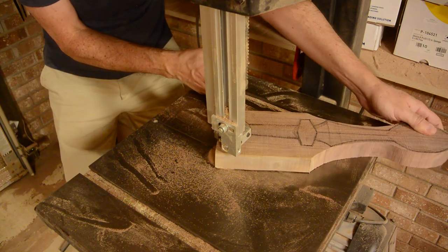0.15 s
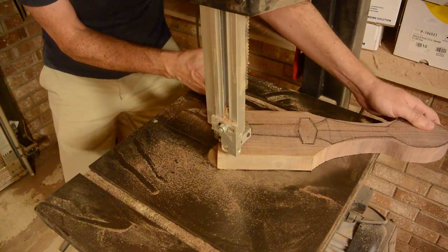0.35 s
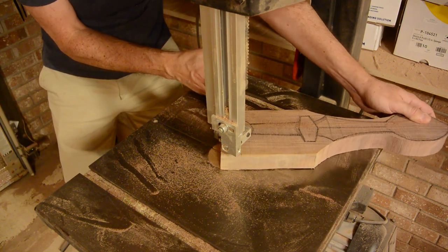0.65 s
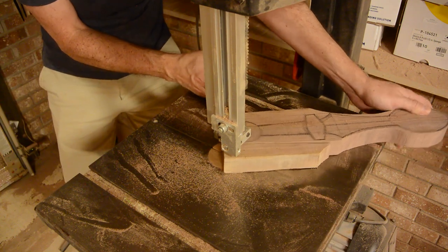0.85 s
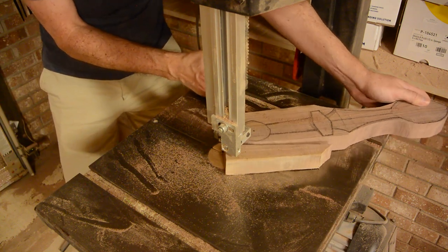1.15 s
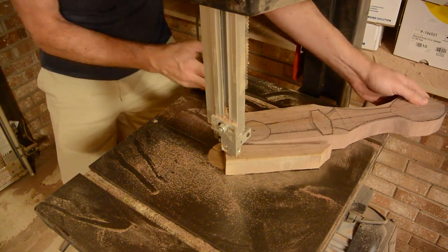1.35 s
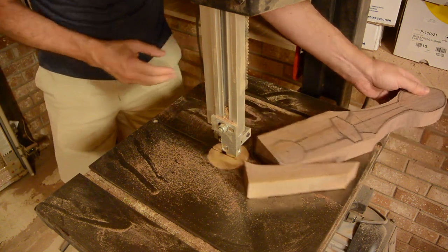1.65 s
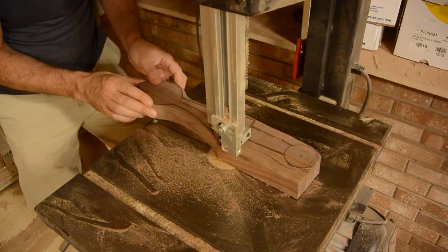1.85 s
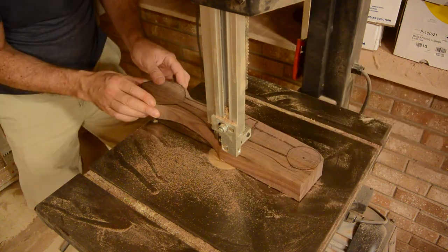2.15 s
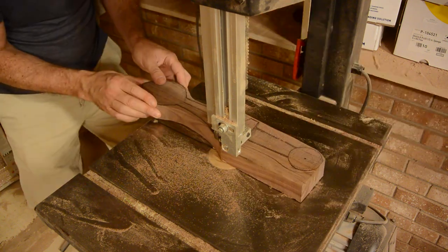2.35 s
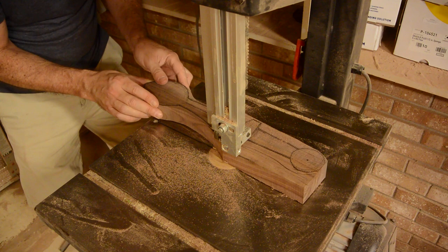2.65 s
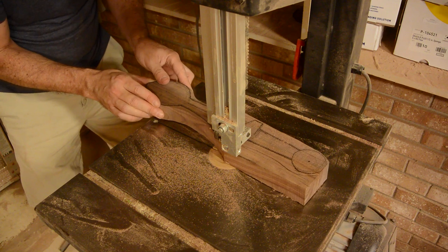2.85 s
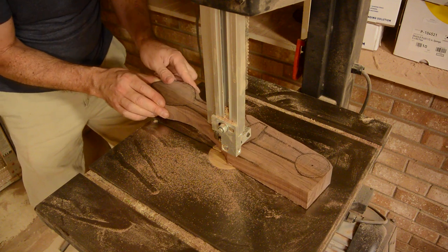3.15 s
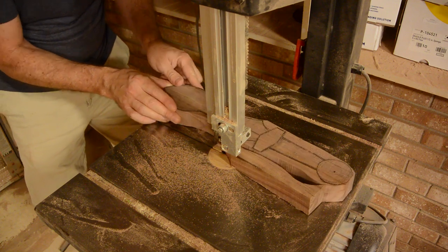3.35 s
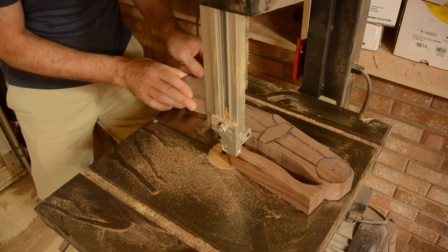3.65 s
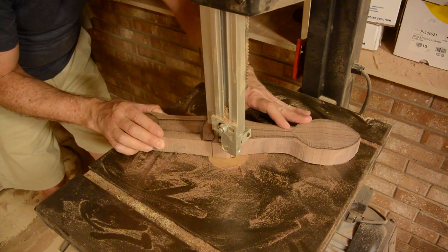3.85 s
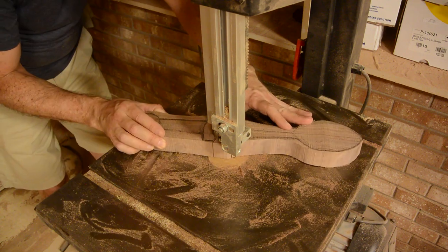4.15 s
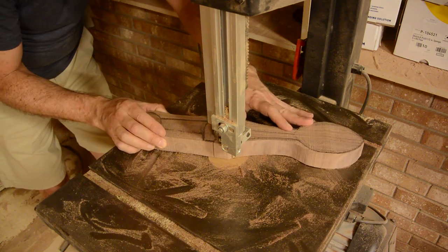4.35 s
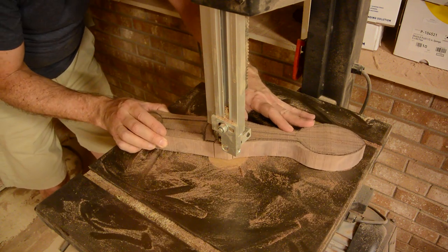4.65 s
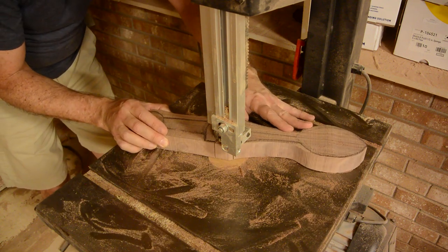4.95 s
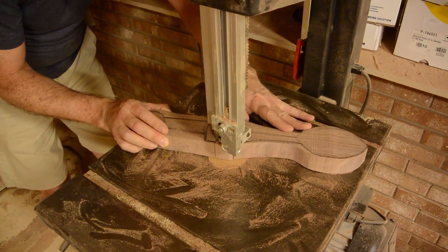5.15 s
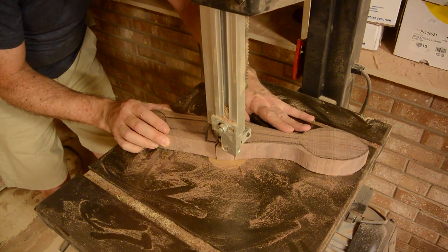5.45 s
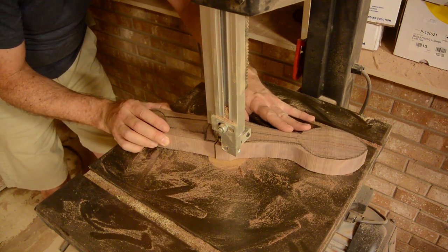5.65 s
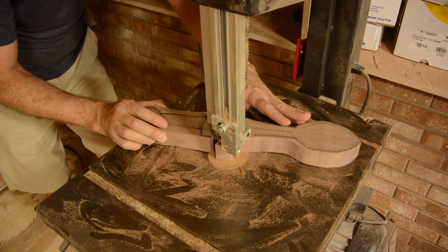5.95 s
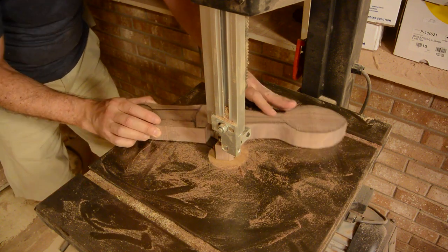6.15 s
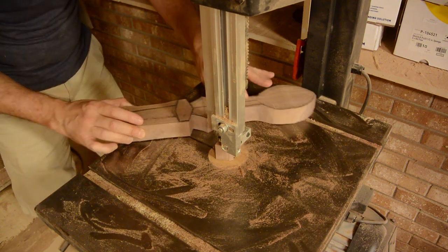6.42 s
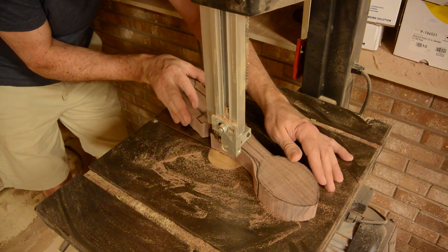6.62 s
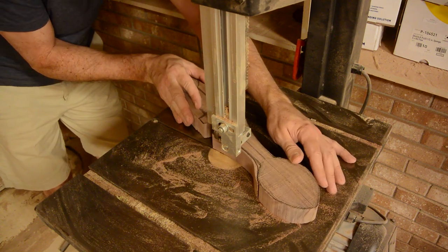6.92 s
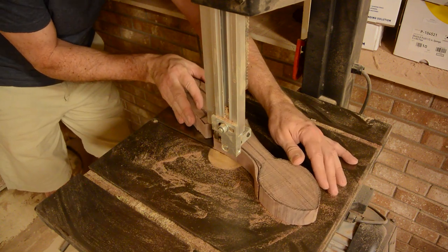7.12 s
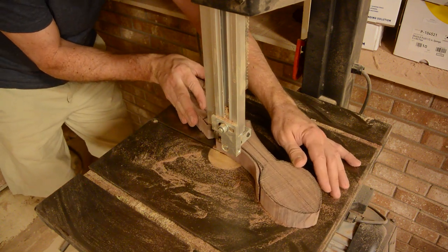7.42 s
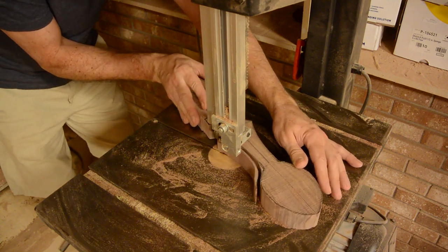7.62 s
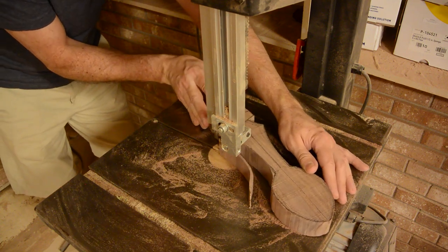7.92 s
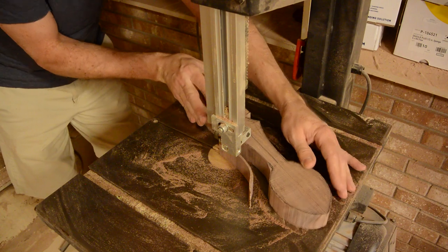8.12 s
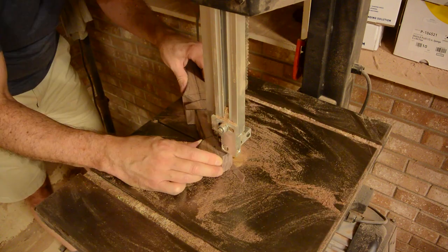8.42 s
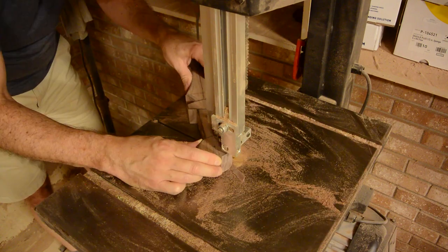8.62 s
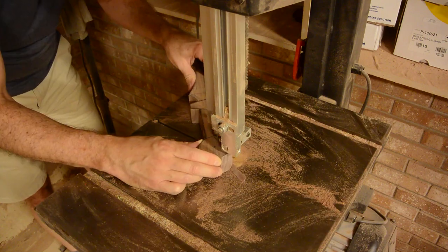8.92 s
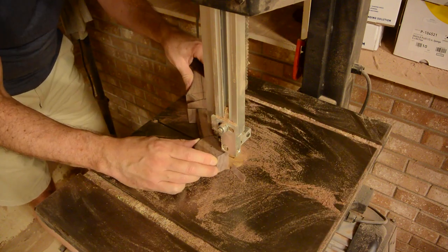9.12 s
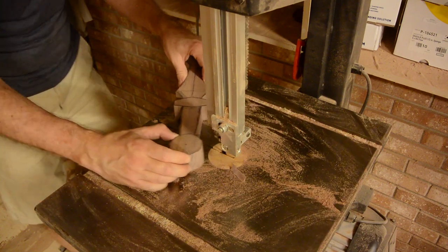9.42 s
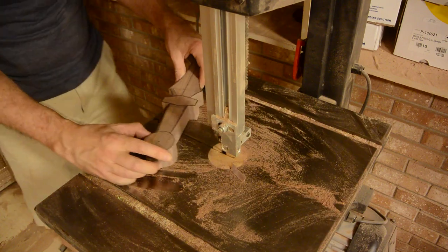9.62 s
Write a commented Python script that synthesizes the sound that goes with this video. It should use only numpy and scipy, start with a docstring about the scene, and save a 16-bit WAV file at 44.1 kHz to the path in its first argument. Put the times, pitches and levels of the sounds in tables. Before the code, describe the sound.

Close stereo pickup of a bandsaw cutting a shaped hardwood board. It starts mid-cut with rasping and squealing, breaks free into bright hiss and a low sagging flutter, then bites again four more times, the third cut longest and the fifth shortest. The board scrapes and knocks on the iron table. The level ducks in the cuts and rises afterward, with a short, dense room tail.

```python
"""Bandsaw in hardwood

A bandsaw in a small workshop makes five cuts in a thick hardwood board, close to a camera.
Free, the band hisses and rings: coloured noise and wavering sines. In the wood, a sine at the tooth rate,
pulsing noise and narrow noise bands sing, rasp and squeal. The board scrapes and knocks: noise bursts.
The camera's gain control ducks under each cut and swells back up when the blade breaks out."""
import sys
import numpy as np
from scipy import signal
from scipy.fft import rfft, irfft, next_fast_len
from scipy.io import wavfile
from scipy.ndimage import uniform_filter1d, map_coordinates

SR = 44100
rng = np.random.default_rng(int(sys.argv[2]) if len(sys.argv) > 2 else 0)


def int16_out(signal):
    """Quantize to a 16-bit WAV file."""
    q = np.round(np.clip(np.atleast_2d(signal).T, -1, 1) * 32767)
    wavfile.write(sys.argv[1], SR, q.astype(np.int16))


N = 431298

# The blade is in the wood. Each row: start in seconds, end in seconds, tooth rate in Hz,
# relative levels of tooth tone, rasp and sawdust hiss in dB, surge at the exit in dB,
# band slack afterwards in seconds, relative level of the flapping afterwards in dB.
CUTS = [(0, 0.91, 643, -39.5, -32, -34, -4, 0.4, -35), (1.881, 3.286, 643, -43.5, -33.5, -37, 5, 0.35, -39),
        (3.848, 5.491, 645.8, -36, -29.5, -32, -3.5, 0.095, -33.5),
        (6.534, 7.79, 650, -39.5, -32, -32.5, 1, 0.08, -32.5),
        (8.455, 8.835, 637, -57, -35.5, -36, -1, 0.044, -32)]


def amp(db):
    """Decibels to gain."""
    return 10 ** (np.asarray(db) / 20)


def unit(x):
    """x at rms 1."""
    return x / np.sqrt(np.mean(x ** 2) + 1e-20)


def clock():
    """The time of each sample in seconds."""
    return np.arange(N) / SR


def along(points, hz):
    """Interpolate (Hz, value) points on a log frequency axis."""
    point_hz, values = np.transpose(points)
    return np.interp(np.log(hz + 1), np.log(point_hz + 1), values)


def wobble(rate_hz, size=N):
    """A smooth random curve with rate_hz knots a second."""
    t = np.arange(size) / SR
    coarse_t = t[::32]
    knots = rng.standard_normal(int(size * rate_hz / SR) + 4)
    coarse = map_coordinates(knots, [coarse_t * rate_hz])
    return np.interp(t, coarse_t, coarse)


def gate(t, start, end, edge_s):
    """1 from start to end, with ramps edge_s long centred on both."""
    return np.clip(np.minimum(t - start, end - t) / edge_s + .5, 0, 1)


def noise(colour_db, size=N):
    """Stereo noise with a mid of rms 1; the treble is wider than the bass."""
    # Each row: frequency in Hz, side minus mid in dB.
    side_width = [(60, -31), (110, -15.5), (210, -20), (390, -21.5), (730, -8.5), (1370, -11), (2550, -7),
                  (4760, -7), (8900, -3.5)]
    m = next_fast_len(size, True)
    hz = np.fft.rfftfreq(m, 1 / SR)
    spectra = rfft(rng.standard_normal((2, m))) * amp(colour_db(hz))
    spectra = spectra * [np.ones(len(hz)), amp(along(side_width, hz))]
    mid, side = irfft(spectra, m)[:, :size]
    return np.array([mid + side, mid - side]) / np.std(mid)


def burst(start, end, colour_db, edge_s):
    """Noise of one colour that fades in and out."""
    t = np.arange(int(max(end - start, edge_s) * SR)) / SR
    return noise(colour_db, size=len(t)) * gate(t, edge_s / 2, t[-1] - edge_s / 2, edge_s)


def tone(hz):
    """A sine of rms 1 that follows a pitch curve."""
    return np.sqrt(2) * np.sin(2 * np.pi * np.cumsum(hz) / SR)


def add(track, start, sound):
    """Mix a stereo sound in at start seconds."""
    part = track[:, max(round(start * SR), 0):][:, :sound.shape[1]]
    part += sound[:, :part.shape[1]]


def below(x, edge_hz):
    """x with a steep low-pass."""
    m = next_fast_len(N + SR // 4, True)
    hz = np.fft.rfftfreq(m, 1 / SR)
    return irfft(rfft(x, m) / np.sqrt(1 + (hz / edge_hz) ** 120), m)[:, :N]


def frame_db(hz, in_kerf):
    """Lift of the saw's resonances; wood in the kerf damps some and drives others."""
    # Resonances of band, guides and frame. Each row: centre in Hz, width in Hz,
    # lift running free in dB, lift cutting in dB.
    modes = [(541.7, 46, 14.5, 0.5), (793, 13, 5.5, -10.5), (883, 29, 9.5, 11), (937, 21, 9, -10),
             (1124, 56, 9.5, -7), (1340, 116, 6, -6.5), (1407, 35, 13.5, 0.5), (1514, 43, 8, -4.5),
             (1843, 62, 12.5, 1.5), (2092, 110, 10, -1.5), (2510, 75, 8, 6), (2717, 35, 7.5, 12),
             (3051, 160, 12, 9), (3212, 102, 11.5, 11), (3550, 110, 3, 3.5), (3950, 120, 10, 3.5),
             (4570, 120, 3, 4.5), (5430, 59, 5, -3), (5640, 110, 6, 5), (5888, 49, -0.5, 8.5),
             (5819, 125, 13, 4), (5943, 52, 13, 16.5), (6004.5, 59, 11.5, 12.5), (6170, 97, 7.5, 7),
             (6410, 200, -5, 11.5), (6750, 180, 5, 1.5), (6800, 90, -1.5, 1.5), (7900, 88, 6, -12),
             (8304, 224, 14, 9.5), (8673, 414, 29, 17.5)]
    return sum((held_db if in_kerf else free_db) / (1 + (2 * (hz - centre) / width) ** 2)
               for centre, width, free_db, held_db in modes)


def peak_db(hz, centre, width):
    """One narrow resonance with steep skirts, 9.5 dB down at width from its centre."""
    return -20 * np.log10(1 + ((hz - centre) / width) ** 2 * 2)


def in_wood():
    """1 while the blade cuts, 0 while it runs free."""
    return sum(gate(clock(), start, end, 0.024) for start, end, *_ in CUTS)


def feed():
    """Gains of tooth tone, rasp and hiss: each cut bites, holds and changes force at the exit."""
    # The hands ease the feed. Each row: centre in seconds, half length in seconds,
    # change of the tooth tone in dB.
    eases = [(.6, .05, -4), (0.813, .03, -5), (4.035, 0.037, -8), (4.352, 0.021, -12), (5.3, 0.096, -15),
             (7.63, 0.057, -5)]
    entry_db, entry_s = 1, .06  # the teeth bite harder as they enter
    exit_s = 0.072  # the last fibres give way
    rasp_share = 0.086  # share of the easing that rasp and hiss follow
    t = clock()
    gains = np.zeros((3, N))
    for start, end, _, tooth_db, rasp_db, hiss_db, surge_db, *_ in CUTS:
        entry = entry_db * np.exp(-abs(t - start) / entry_s)
        surge = surge_db * np.exp(-abs(end - t) / exit_s)
        levels = amp([tooth_db + surge, rasp_db + entry + surge, hiss_db + entry])
        gains += gate(t, start, end, 0.013) * levels
    ease = sum(db * np.exp(-((t - centre) / half) ** 2) for centre, half, db in eases)
    return gains * amp([ease, rasp_share * ease, rasp_share * ease])


def cutting(rasp_db, dust_db, tooth_db, hum_db, hum_hz, bite, grain_db):
    """Each tooth tears out a chip: a tone at the tooth rate and pulsing noise through the frame."""
    # Rasp. Each row: frequency in Hz, colour in dB.
    rasp_colour = [(20, -61.5), (160, -64), (220, -17.5), (420, -19), (700, -47), (1100, 3.5), (1650, -5.5),
                   (2100, 6), (2900, -3), (3700, -0.5), (4500, -3.5), (5200, -15), (6000, -7),
                   (6800, -32.5)]
    # Sawdust hiss. Each row: frequency in Hz, colour in dB.
    dust_colour = [(3500, -50.5), (5200, 2), (5600, 6.5), (6400, 7.5), (7100, 9), (7900, 2.5), (8800, -13)]
    # Turning the board pinches the band. Each row: tightest at seconds, relative hum level in dB,
    # rise in dB per second, fall in dB per second.
    pinches = [(.58, -25.5, 129, 37), (1.91, -29, 303.5, 27), (3.14, -40.5, 154, 104), (4.1, -46, 46, 34),
               (4.92, -47.5, 25, 59), (7.48, -33.5, 13.5, 44)]
    t = clock()
    tooth_gain, rasp_gain, dust_gain = feed()
    rate_points = [(s, hz) for start, end, hz, *_ in CUTS for s in (start, end)]
    rate_hz = np.interp(t, *np.transpose(rate_points))
    teeth = tone(rate_hz + 2.61 * wobble(25))
    # hard and soft grain changes the force on the teeth
    force = amp(grain_db * wobble(22) + 1.22 * wobble(130)) * unit(1 + bite * teeth)
    tearing = noise(lambda hz: along(rasp_colour, hz) + frame_db(hz, in_kerf=True))
    tearing *= amp(rasp_db) * rasp_gain
    spray = noise(lambda hz: along(dust_colour, hz) + frame_db(hz, in_kerf=True))
    spray *= amp(dust_db + 0.99 * wobble(25)) * dust_gain
    # pinched in the kerf, the band hums like a string
    pinch = in_wood() * sum(amp(db - np.maximum(rise * (s - t), fall * (t - s)))
                            for s, db, rise, fall in pinches)
    hum = amp(hum_db + 3.0 * wobble(25)) * pinch * tone(hum_hz + 3 * wobble(18))
    singing = amp(tooth_db + 3.1 * wobble(20)) * tooth_gain * teeth
    return force * (tearing + spray) + singing + hum


def squeals(level_db, kerf_db, surge_db, lock_hz):
    """Pressed sideways, the band locks onto narrow resonances that swell, waver and surge with the grain."""
    # The band sings in every kerf. Each row: centre in Hz, width in Hz, relative level in dB.
    kerf_tones = [(543, 45, -42.5), (2154, 54, -38.5), (2560, 100, -39.5), (3653, 110, -39.5),
                  (3840, 100, -43), (7745, 25, -47)]
    # Squeals. Each row: start in seconds, end in seconds, centre in Hz, glide in Hz per second,
    # width in Hz, relative level in dB, depth of random pulsing in dB (either sign).
    squeal_notes = [(0, 0.52, 1625, 6, 66, -31, 3), (0, 0.473, 1928, 1, 5.4, -32.5, -1.5),
                    (0, 0.856, 3705, 2, 100, -28.5, 4.5), (0, 0.89, 1137, 0.5, 83, -38.5, -1.5),
                    (0, 0.297, 2720, -7, 54, -33.5, 1), (0, 0.896, 4240, -1.5, 500, -35, 1),
                    (0.308, .905, 7700, 1, 32, -37.5, 2.5), (0.663, .832, 1660, -300, 88, -31.5, 0.5),
                    (.752, 0.833, 2540, 2, 55, -31, 4), (0.872, 0.918, 4540, -1200, 70, -37, 2),
                    (1.965, 3.255, 2155, 2, 27, -37, 0), (2.001, 3.3, 902, 0.5, 55, -42.5, -0.5),
                    (2.028, 3.295, 3585, 0, 150, -36.5, 0), (2.113, 2.223, 529, 0, 39, -34, 3),
                    (2.499, 2.587, 2510, 0, 80, -31, 6), (2.608, 3.105, 2930, 2, 290, -35.5, 2),
                    (2.855, 2.925, 2750, -3500, 100, -34, 2), (3.035, 3.11, 3660, 2498, 76, -36, 2),
                    (3, 3.28, 3860, 303, 90, -36, 2), (3.192, 3.265, 4230, 0, 490, -39, 3),
                    (3.277, 3.302, 2595, 0, 30, -25.5, 1), (3.87, 5.35, 2210, -0.5, 17, -35, 0),
                    (3.873, 4.69, 3580, 0, 169, -32, 1), (3.924, 4.153, 1880, -1, 18, -30.5, 5.5),
                    (3.982, 5.005, 2560, -1.5, 21, -33.5, 9), (4.357, 5.406, 6800, 1.5, 430, -34, 2),
                    (4.373, 4.61, 1910, 0, 40, -32.5, 2), (4.402, 5.503, 1320, 0.5, 44, -38, 4.5),
                    (4.635, 4.873, 1888, -1, 10, -30.5, 2.5), (4.981, 5.153, 1878, -150, 10, -29.5, 3.5),
                    (5.165, 5.237, 2100, 0, 36, -31.5, -3), (5.174, 5.25, 2535, 0, 40, -24.5, 7),
                    (5.205, 5.49, 4480, 0, 92, -40, 5), (5.306, 5.488, 2552, 0, 8.6, -25.5, 2.5),
                    (6.522, 6.903, 4410, -300, 330, -30.5, 3.5), (6.535, 6.896, 3610, 0, 72, -27, 1.5),
                    (6.555, 7.775, 2140, -0.5, 22, -38, 3), (6.695, 6.73, 4330, -3000, 80, -31, 1),
                    (6.764, 7.108, 4201, -900, 170, -33, 6), (6.884, 7.59, 3590, -41, 66, -29, 2),
                    (6.906, 7.339, 1920, -250, 13, -34, 2), (6.916, 7.51, 4360, 2, 350, -34, 6),
                    (6.999, 7.11, 4000, -700, 64, -35, 3), (7.175, 7.305, 3750, 700, 70, -29.5, 7),
                    (7.625, 7.785, 7700, 0, 18, -42.5, 4), (8.461, 8.497, 2170, 2, 110, -26.5, -3),
                    (8.5, 8.84, 2120, -3, 91, -35, -3.5), (8.505, 8.84, 2480, 2, 67, -39.5, -4)]
    longest_swell_s = .06
    wander = 0.00249  # waver as a share of the pitch
    roam = 0.0978  # further waver as a share of the width: broad, rasping squeals roam further
    out = sum(amp(db + kerf_db + 2.6 * wobble(7.7)) * noise(lambda hz: peak_db(hz, centre, width))
              for centre, width, db in kerf_tones)
    for start, end, centre, glide, width, db, pulsing_db in squeal_notes:
        swell_s = min(longest_swell_s, max((end - start) / 3, .005))
        band = burst(start, end + swell_s, lambda hz: peak_db(hz, centre, width), edge_s=0.005)
        note = signal.hilbert(band)
        size = note.shape[1]
        t = np.arange(size) / SR
        shift_hz = (wander * centre + roam * width) * wobble(14, size=size)
        shift_hz += glide * (t - t[-1] / 2)
        shifted = (note * np.exp(2j * np.pi * np.cumsum(shift_hz) / SR)).real
        envelope = gate(t, swell_s / 2, t[-1] - swell_s / 2, swell_s)
        envelope *= amp(pulsing_db * wobble(32.04, size=size))
        # friction limits the swing: notes narrower than lock_hz hold a more even level
        evenness = 1 / (1 + (width / lock_hz) ** 2)
        swing = (unit(abs(note.mean(axis=0))) + 0.43) ** evenness
        add(out, start - swell_s / 2, amp(db + level_db) * unit(envelope * shifted / swing))
    return out * in_wood() * amp(surge_db * wobble(13))


def free_saw(band_db, damped_db, whine_db, whine_hz, ring_db, flap_db, flutter_db):
    """The running band rubs unevenly in its guides, rings and rattles; the drive whines."""
    # Rubbing in the guides. Each row: frequency in Hz, colour in dB.
    guide_colour = [(20, -36), (160, -29), (205, -4.5), (300, -7.5), (450, -5.5), (800, -1), (1020, -2.5),
                    (1650, -4), (2400, 0), (4400, -7.5), (5200, -5), (6300, -1), (6900, -3.5), (7700, -12),
                    (8800, -39)]
    # Rattle of the free band. Each row: frequency in Hz, colour in dB.
    rattle_colour = [(145, -48), (190, -31.5), (218, 8), (255, 1.5), (290, -20.5), (400, -53)]
    # The free band rings between cuts. Each row: start in seconds, end in seconds, relative level in dB.
    ring_spans = [(0.995, 1.885, -36), (3.335, 3.863, -32.5), (5.587, 6.53, -35.5), (7.867, 8.46, -37),
                  (8.905, 9.85, -34)]
    # Two neighbouring pitches. Each row: centre in Hz, waver in Hz, relative level in dB.
    ring_tones = [(1407, 18.9, -1.5), (1501, 15.8, -8)]
    slack_db = -3  # freed from the kerf, the band rubs its guides less for a moment
    ring_edge_s = 0.034
    t = clock()
    held = in_wood()
    slack = sum(gate(t, end, end + slack_s, 0.081) for _, end, *_, slack_s, _ in CUTS)
    rub = noise(lambda hz: along(guide_colour, hz) + frame_db(hz, in_kerf=False))
    unevenness_db = flutter_db * wobble(45) + 0.096 * wobble(19)
    rub *= amp(band_db + damped_db * held + slack_db * slack + unevenness_db)
    whine = amp(whine_db + 1.5 * wobble(8.0)) * tone(whine_hz + 2.65 * wobble(11))
    ringing = sum(amp(db + ring_db) * gate(t, start, end, ring_edge_s) for start, end, db in ring_spans)
    ring = sum(amp(db + 3.5 * wobble(60)) * tone(centre + waver * wobble(90))
               for centre, waver, db in ring_tones)
    rattle = amp(flap_db) * noise(lambda hz: along(rattle_colour, hz))
    # wood around the band stops its ringing and rattle
    return rub + whine + (1 - held) * (ringing * ring + rattle)


def board(drag_db, knock_db, knock_rise_s):
    """The board drags and judders on the iron table; board and offcut knock on it as decaying noise."""
    # Drags. Each row: start in seconds, end in seconds, relative level in dB.
    drag_spans = [(0.55, 0.93, -35), (1.891, 2.425, -37.5), (3.116, 3.284, -40), (3.608, 3.854, -45),
                  (6.197, 6.526, -46.5), (6.597, 7.418, -38.5), (7.453, 7.584, -30)]
    # Knocks, harder contacts brighter. Each row: start in seconds, relative level in dB,
    # t60 in seconds, rings from Hz, bright up to Hz.
    knock_hits = [(1.888, -17.5, 0.23, 150, 1400), (1.928, -8, 0.05, 400, 4000),
                  (1.941, -10.5, 0.074, 300, 1000), (7.455, -17, 0.069, 200, 3000),
                  (7.484, -17, 0.078, 200, 1700), (7.519, -12, 0.077, 200, 3020),
                  (7.527, -10.5, 0.11, 200, 3200), (8.4523, -2, 0.017, 500, 1450)]
    # Scraping. Each row: frequency in Hz, colour in dB.
    scrape_colour = [(150, -63), (220, -1), (380, -7), (500, 5), (900, -7), (1300, -8), (2000, -1.5),
                     (5000, -37.5)]
    # What a knock rings with. Each row: frequency in Hz, colour in dB.
    wood_colour = [(130, -38), (220, -2), (380, -10), (600, 4.5), (850, -4), (1130, 3.5), (1550, -7),
                   (2300, 1), (3200, 0), (5000, -15), (9000, -25)]
    drags, knocks = np.zeros((2, N)), np.zeros((2, N))
    t = np.arange(SR // 4) / SR
    for start, end, db in drag_spans:
        scrape = burst(start, end, lambda hz: along(scrape_colour, hz), edge_s=0.0095)
        add(drags, start, amp(db + drag_db) * scrape)
    for start, db, t60_s, low_hz, bright_hz in knock_hits:
        def colour_db(hz):
            """Wood colour between low_hz and bright_hz."""
            skirts = (hz / bright_hz) ** 6 + (low_hz / (hz + 1)) ** 6
            return along(wood_colour, hz) - 10 * np.log10(1 + skirts)
        envelope = amp(db + knock_db - 60 * t / t60_s) * (1 - np.exp(-t / knock_rise_s))
        add(knocks, start, envelope * noise(colour_db, size=len(t)))
    return drags * amp(2.4 * wobble(50)) + knocks


def flapping(level_db, width_hz):
    """Each time the blade breaks out, the band flutters as a wavering sine, sinks in pitch and fades."""
    first_hz, rest_hz, sag_s = 261.7, 207.6, 0.5
    delay_s, rise_s, fade_db_per_s = 0.0683, 0.1, 26
    out = np.zeros(N)
    for _, end, *_, db in CUTS:
        age = np.maximum(clock() - end - delay_s, 0)
        hz = rest_hz + (first_hz - rest_hz) * np.exp(-age / sag_s)
        swing = np.minimum(age / rise_s, 1) * amp(db + level_db - fade_db_per_s * age)
        out += swing * tone(hz + width_hz * wobble(60))
    return out * amp(1.9 * wobble(30)) * (1 - in_wood())


def ticks(thump_db, thump_t60_s, tick_t60_s):
    """Dry ticks of decaying noise, each over a faint, short, low thump with no ring."""
    # Each row: start in seconds, relative thump level in dB, tick level in dB.
    tick_times = [(1.884, -52, -45), (3.853, -44, -12), (6.5235, -38, -21), (8.458, -56, -18)]
    # Thump. Each row: frequency in Hz, colour in dB.
    thump_colour = [(20, 9), (90, 5), (200, 0), (500, 4), (2000, -56)]
    # Tick. Each row: frequency in Hz, colour in dB.
    tick_colour = [(500, -4), (3000, 11), (8000, -5), (11000, -10), (15000, -14)]
    out = np.zeros((2, N))
    t = np.arange(SR // 4) / SR
    for start, db, tick_db in tick_times:
        thump = noise(lambda hz: along(thump_colour, hz), size=len(t))
        tick = noise(lambda hz: along(tick_colour, hz), size=len(t))
        add(out, start, amp(db + thump_db - 60 * t / thump_t60_s) * thump)
        add(out, start, amp(tick_db - 60 * t / tick_t60_s) * tick)
    return out


def workshop(x, wet_db, t60_s):
    """Close brick walls answer with a short, dense tail of decaying noise."""
    t = np.arange(SR // 4) / SR
    tail = noise(np.zeros_like, size=len(t)) * amp(-60 * t / t60_s) * (t > .003)
    tail /= np.linalg.norm(tail, axis=1, keepdims=True)
    return x + amp(wet_db) * signal.fftconvolve(x, tail, axes=1)[:, :N]


def gain_control(x, target_db, most_db, release_db_per_s, window_s, attack_s):
    """The gain drops when the level rises, smoothed over attack_s, and climbs back at a steady rate."""
    power = uniform_filter1d(np.mean(x ** 2, axis=0), max(int(window_s * SR), 1))
    level_db = 10 * np.log10(abs(power) + 1e-12)
    fall_db = release_db_per_s * clock()
    held_db = np.maximum.accumulate(level_db + fall_db) - fall_db
    gain_db = np.minimum(target_db - held_db, most_db)
    keep = np.exp(-1 / (attack_s * SR))
    return x * amp(signal.lfilter([1 - keep], [1, -keep], gain_db))


def scene():
    """Saw, cut and board in the room, with the dry ticks on top."""
    cut = cutting(rasp_db=8.0, dust_db=6.5, tooth_db=4.5, hum_db=0.0, hum_hz=249.0, bite=0.21, grain_db=0.46)
    singing = squeals(level_db=4.0, kerf_db=1.5, surge_db=1.5, lock_hz=69)
    saw = free_saw(band_db=-24, damped_db=-0.5, whine_db=-48, whine_hz=687.4,
                   ring_db=-1.5, flap_db=-51.5, flutter_db=1.12)
    wood = board(drag_db=4.0, knock_db=-2.5, knock_rise_s=0.0026)
    flap = flapping(level_db=-5, width_hz=12.95)
    room = workshop(saw + flap + cut + singing + wood, wet_db=-14, t60_s=.3)
    return below(room, edge_hz=9200) + ticks(thump_db=1.0, thump_t60_s=0.046, tick_t60_s=0.005)


def record(dry):
    """The camera: two unequal microphones, gain control and a band limit."""
    # Each row: frequency in Hz, left minus right in dB.
    mic_lean = [(60, -0.5), (190, 0), (280, 2.1), (410, 0.5), (600, 0.5), (890, -0.5), (1300, 0.5),
                (1910, -1), (2810, -4), (4120, -1.5), (6060, 0.5), (8900, 0.5)]
    m = next_fast_len(N + SR // 4, True)
    half_lean_db = along(mic_lean, np.fft.rfftfreq(m, 1 / SR)) / 2
    heard = irfft(rfft(dry, m) * amp([half_lean_db, -half_lean_db]), m)[:, :N]
    levelled = gain_control(heard, target_db=-16.5, most_db=6.5, release_db_per_s=32.5,
                            window_s=0.0059, attack_s=0.0019)
    return below(levelled, edge_hz=15100)


dry = scene()
out = record(dry)
int16_out(out)
```